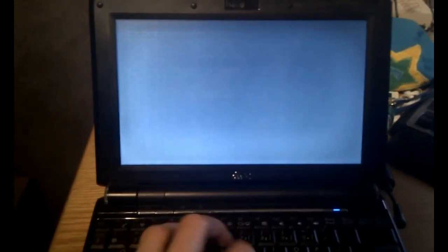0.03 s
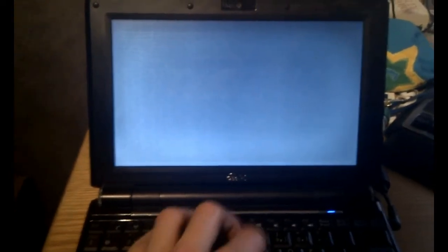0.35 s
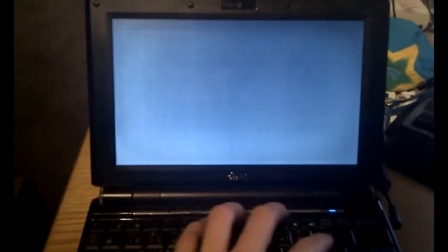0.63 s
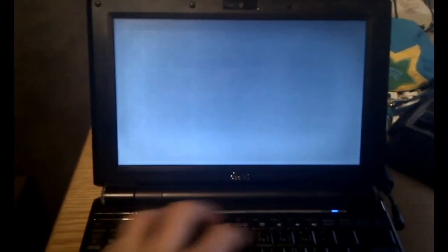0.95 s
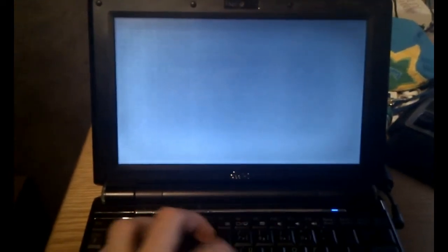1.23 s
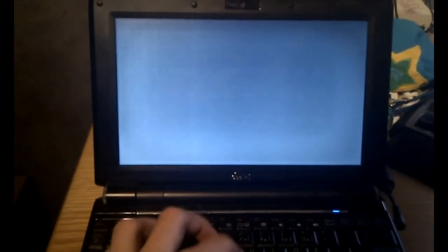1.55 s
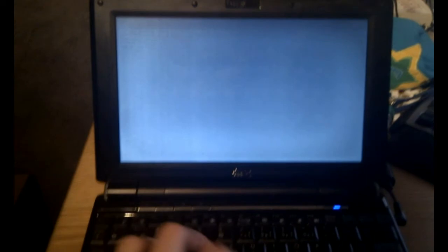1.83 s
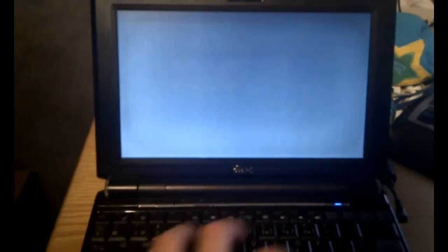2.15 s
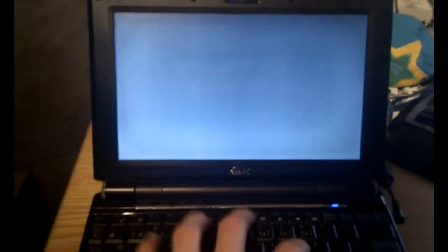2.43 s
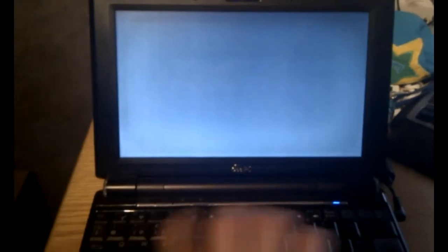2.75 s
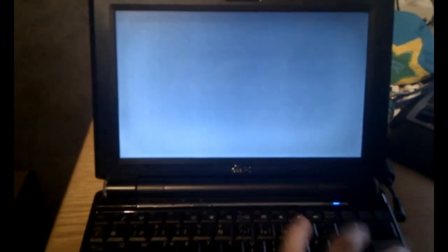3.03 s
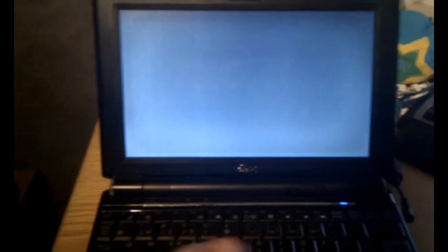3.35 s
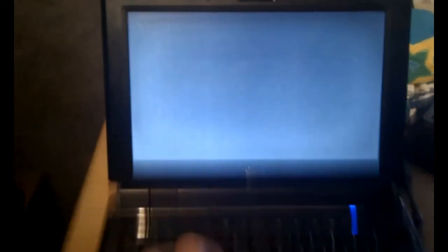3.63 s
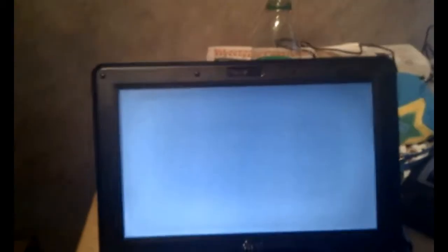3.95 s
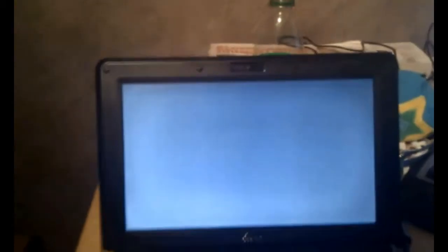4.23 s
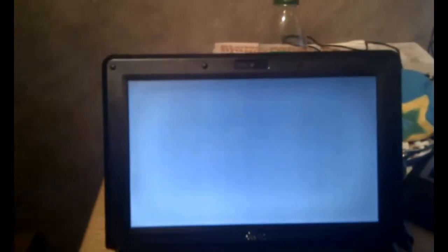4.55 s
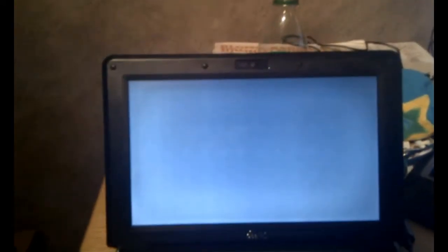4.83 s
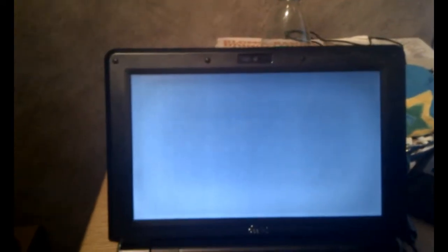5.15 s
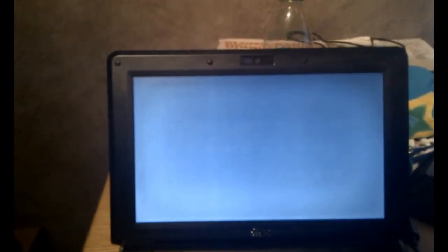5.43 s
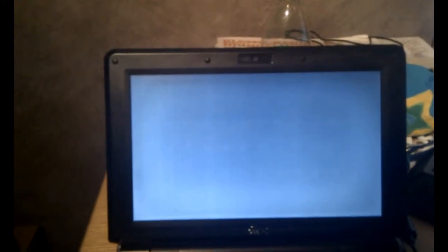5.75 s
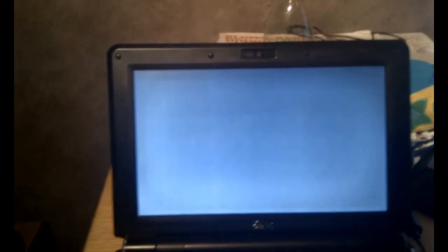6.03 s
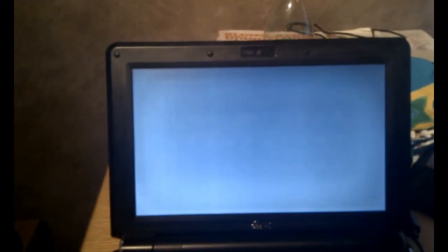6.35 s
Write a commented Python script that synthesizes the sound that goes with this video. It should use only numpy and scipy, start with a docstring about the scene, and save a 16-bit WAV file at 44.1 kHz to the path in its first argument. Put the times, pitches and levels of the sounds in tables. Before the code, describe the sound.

Over a steady hiss and a faint fan hum, small laptop keys click unevenly at close range. A big key lands with a hollow clack, a couple of soft ticks follow, and the typing rests briefly. A second, denser run of plastic clicks ends, after a short gap, in another hard clack. The small room rings very briefly after each stroke.

```python
"""In a quiet room with a steady hiss and a faint fan hum, someone types on a small plastic laptop keyboard.
A first burst ends in the hard clack of a big key at 2.6 s, followed by two soft clicks. After a pause
a second burst runs from 4 to 5.5 s, and the big key clacks again at 6.2 s.
Each stroke is a few tiny contacts: the key cap rings, the plastic snaps, the case knocks.
A near wall echoes every click, and the room rings briefly after it."""
import sys
import numpy as np
from scipy import signal
from scipy.fft import rfft, irfft
from scipy.io import wavfile

SR = 44100
rng = np.random.default_rng(int(sys.argv[2]) if len(sys.argv) > 2 else 0)


def dump_mix(stems):
    """Bounce the given channels to the path in sys.argv[1] as a 16-bit WAV at rate SR."""
    frames = np.atleast_2d(stems).T  # one column per channel
    limited = np.clip(frames, -1, 1)  # hard clip at full scale
    pcm = np.round(limited * 32767).astype(np.int16)
    wavfile.write(sys.argv[1], SR, pcm)


N = 281799

# tone of the fan's air and the microphone's hiss: (frequency [Hz], relative level [dB])
AIR_TONE = [(20, -4.5), (60, 3), (110, -5), (290, 4.5), (430, 1), (600, -0.5), (1000, -1), (1850, -3),
            (2400, -8.5), (5500, -10.5), (9500, -12.5), (13000, -12.5), (16000, -12.5)]
# hums of the fan and desk: (pitch [Hz], width [Hz], level [dB])
FAN_HUMS = [(142.4, 10.6, -69.5), (227.5, 16.5, -67), (354.4, 2.9, -71), (397.5, 9.4, -69),
            (567.5, 4.4, -76), (948.5, 11, -72)]
# tone of the room's ringing: (frequency [Hz], relative level [dB])
ROOM_TONE = [(300, -7), (1200, 7.5), (3000, 3), (5300, 3), (6300, 2), (8500, -9.5), (12000, 1), (16000, 2)]
# how long the room rings: (frequency [Hz], time to fade by 60 dB [s])
ROOM_FADE = [(500, 0.13), (2000, 0.21), (6000, 0.3), (10000, 0.27), (16000, 0.12)]
# notes the laptop case rings at: (pitch [Hz], relative level [dB], time to fade by 60 dB [s])
CASE_NOTES = [(890, -11, .02), (1000, 2.5, 0.047), (1167, 3.5, 0.04), (1350, 6, 0.023), (1735, 5, 0.023),
              (2150, -6, 0.02), (3120, 3, 0.01)]
# tone of a key cap around its ring: (frequency [Hz], relative level [dB])
CAP_TONE = [(3500, -35), (4900, -13.5), (5500, -2.5), (6200, 1.5), (7200, 0.5), (8400, -1), (9500, -4),
            (11000, -33), (16000, -33)]
# tone of plastic snapping on plastic: (frequency [Hz], relative level [dB])
SNAP_TONE = [(300, -22), (900, -19.5), (2400, -9), (3200, -10), (4400, -4.5), (5000, -15), (8500, -15),
             (9900, 3), (11200, 3.5), (12200, 4.5), (13300, 0.5), (15800, -4.5)]
# the big key's clacks: (press time [s], travel time [s], force at the top [dB],
# force at the bottom [dB], case pitch [Hz], release time [s], release force [dB])
BIG_CLACKS = [(2.5824, .0072, -2, -4.5, 1140, 2.6685, -13), (6.1783, .0048, -0.5, 2.5, 1710, 6.2618, -0.5)]
# going down, the big key is touched, gives way, meets its bed and settles:
# (share of travel time [ratio], base ring [dB], base snap [dB], base knock [dB])
BIG_PRESS = [(-.3, -21.5, -38, -58), (0, -17.5, -21.5, -46), (.65, -18.5, -16.5, -46), (1, -26, -21.5, -29)]
# coming up, it lifts off, springs back and hits its stop:
# (share of return time [ratio], base ring [dB], base snap [dB], base knock [dB])
BIG_RELEASE = [(0, -25, -28.5, -55), (.5, -22.5, -23.5, -42), (1, -32, -37, -39.5)]
# small keys going down or coming up: (time [s], cap pitch [Hz], base ring [dB], snap [dB],
# case pitch [Hz], knock [dB], bounce fade time [s])
SMALL_STROKES = [(.003, 5440, -38, -43, 1860, -47, 0.035), (0.1642, 8800, -33, -38, 1300, -50, .045),
                 (.2464, 6700, -46, -47, 990, -60, .01), (.267, 8160, -45.5, -44.5, 1730, -54, 0.047),
                 (.8602, 6760, -41, -46, 1330, -51, .005), (.866, 7860, -33, -40.5, 900, -56, .065),
                 (0.948, 6700, -44.5, -56, 1100, -60, 0.018),
                 (1.0345, 6290, -41.5, -44, 1380, -44.5, 0.017), (1.0605, 6890, -44, -42, 970, -57, .005),
                 (1.0697, 6840, -28, -37.5, 1860, -46, 0.0075),
                 (1.15, 8600, -41.5, -47, 1410, -48.5, 0.034),
                 (1.57, 5740, -27.5, -34.5, 1720, -44.5, 0.02),
                 (1.694, 6840, -41.5, -44.5, 2960, -52, .005),
                 (1.8772, 6000, -36.5, -41.5, 1300, -53, 0.017), (1.9088, 7400, -41.5, -49, 900, -55, .025),
                 (2.0087, 8950, -43.5, -45, 880, -51, 0.022), (2.018, 8600, -40.5, -49, 1490, -54, 0.02),
                 (2.1261, 7060, -35.5, -42, 1700, -43, 0.038), (2.1508, 7800, -37, -45, 1175, -29, .008),
                 (2.236, 7960, -47, -52, 1140, -42, 0.024), (2.261, 6200, -37, -62, 970, -52, .005),
                 (2.9382, 5950, -41, -46, 860, -56, 0.018), (2.991, 6800, -50.5, -62, 880, -51, .01),
                 (4.0132, 6640, -47.5, -50, 990, -51, .005), (4.0626, 6800, -54, -62, 860, -49, .005),
                 (4.1713, 6550, -50, -51, 1420, -47, .005),
                 (4.3051, 8000, -37.5, -46.5, 1160, -45.5, 0.0044),
                 (4.3748, 7840, -49, -62, 1530, -52, .005), (4.397, 6900, -49, -55, 1200, -60, .08),
                 (4.449, 6830, -40, -41, 1320, -46, 0.019), (4.553, 6600, -42, -41.5, 1510, -44.5, 0.04),
                 (4.578, 6160, -46.5, -54, 1360, -58, .005), (4.709, 6570, -31.5, -40.5, 1090, -45, 0.0046),
                 (4.7466, 7700, -29, -35.5, 1790, -46, 0.0074), (4.82, 6950, -34.5, -41.5, 1830, -48, .005),
                 (4.887, 6540, -41.5, -49, 1050, -54, 0.045), (4.9495, 6530, -39, -57, 1160, -52, .005),
                 (4.9927, 7240, -30.5, -39, 1590, -45.5, 0.013),
                 (5.0935, 6960, -32.5, -43, 1800, -48, 0.012), (5.13, 6830, -35, -54, 1080, -50, .005),
                 (5.153, 6500, -59, -58, 1400, -46.5, .005), (5.2638, 6940, -35, -61, 1310, -47, .005),
                 (5.3583, 6900, -26.5, -33, 2970, -39, 0.015), (5.3662, 7190, -41, -43, 1220, -45.5, 0.014),
                 (5.4571, 7200, -34, -40.5, 1310, -49, 0.027)]

WALL_DELAY_S = .0095
CONTACT_SAMPLES = 2048
CONTACT_TIME = np.arange(CONTACT_SAMPLES) / SR   # seconds since a contact began


def from_db(db):
    """Turn decibels into a number to multiply by."""
    return 10 ** (np.asarray(db) / 20)


def at_hz(points, hz):
    """Read a table between its rows, with the octaves evenly spaced."""
    row_hz, value = np.transpose(points)
    return np.interp(np.log(np.maximum(hz, 1)), np.log(row_hz), value)


def with_energy(x, energy=1):
    """Scale a sound so its squared samples add up to this energy."""
    return x * np.sqrt(energy / (np.sum(x ** 2) + 1e-20))


def at_level(x, db, window_s=.002):
    """Give a short sound the energy of a brief window at this level."""
    return from_db(db) * with_energy(x, window_s * SR)


def tone_filter(points):
    """Turn a tone table into a filter that makes no sound before the hit (minimum phase)."""
    log_gain = np.log(from_db(at_hz(points, np.fft.rfftfreq(CONTACT_SAMPLES, 1 / SR))))
    cepstrum = irfft(log_gain)[:CONTACT_SAMPLES // 2]
    return np.exp(rfft(np.r_[cepstrum[0], 2 * cepstrum[1:]], CONTACT_SAMPLES))


def resonance(x, hz, width_hz):
    """Make a sound ring at one pitch; a narrower width rings longer."""
    decay = np.exp(-np.pi * width_hz / SR)
    feedback = [1, -2 * decay * np.cos(2 * np.pi * hz / SR), decay ** 2]
    return signal.lfilter(np.array([1, 0, -1]) * (1 - decay ** 2) / 2, feedback, x)


def fan_and_hiss(air_db=-54):
    """Steady air and hiss, with a few narrow hums stirred up by the fan."""
    tone = from_db(at_hz(AIR_TONE, np.fft.rfftfreq(N, 1 / SR)))
    air = irfft(rfft(rng.standard_normal(N)) * tone, N)
    out = from_db(air_db) * with_energy(air, N)
    for hz, width_hz, db in FAN_HUMS:
        hum = resonance(rng.standard_normal(N), hz, width_hz)
        out += from_db(db) * with_energy(hum, N)
    return out


def room(x, level_db=-14.5, build_s=.0015):
    """After the wall's echo, many more blur into a short tail; its lows and very top fade first."""
    t = np.arange(SR // 2) / SR
    edges_hz = np.geomspace(250, 17000, 13)
    tail = 0
    for low, high in zip(edges_hz, edges_hz[1:]):
        hz = np.sqrt(low * high)
        band_pass = signal.butter(2, [low, high], "band", fs=SR, output="sos")
        band = signal.sosfilt(band_pass, rng.standard_normal(len(t)))
        tail += band * from_db(at_hz(ROOM_TONE, hz) - 60 * t / at_hz(ROOM_FADE, hz))
    tail *= 1 - np.exp(-np.maximum(t - WALL_DELAY_S, 0) / build_s)
    return from_db(level_db) * signal.fftconvolve(x, with_energy(tail))[:N]


def wall_echo(x, level_db=-14.5, smear_s=.00072):
    """The near wall throws the sound back, a little late and a little smeared."""
    age = CONTACT_TIME - WALL_DELAY_S
    scatter = rng.standard_normal(CONTACT_SAMPLES) * (age > 0) * np.exp(-np.abs(age) / smear_s)
    return from_db(level_db) * signal.fftconvolve(x, with_energy(scatter))[:N]


def case_knock(pitch_hz, spot_fade_s, notes_db, spread_db=4.5, rise_s=.0005):
    """The spot under the key gives a dull knock; the whole case rings more faintly."""
    t = CONTACT_TIME
    spot = from_db(-60 * t / spot_fade_s) * np.sin(2 * np.pi * pitch_hz * t)
    hz, db, fade_s = np.transpose(CASE_NOTES)[:, :, None]
    strength_db = db + notes_db + spread_db * rng.standard_normal(hz.shape)
    waves = np.sin(2 * np.pi * (hz * t + rng.random(hz.shape)))
    notes = from_db(strength_db - 60 * t / fade_s) * waves
    return (spot + notes.sum(axis=0)) * (1 - np.exp(-t / rise_s))


def thuds(push_db=-40.5, knock_db=-34.5, rise_s=.00053, relax_s=.052):
    """The big key hits bottom: a hollow knock and a quick push of pressure that eases slowly."""
    out = np.zeros(N)
    for down_s, travel_s, _, bottom_db, *_ in BIG_CLACKS:
        time_s = down_s + .642 * travel_s   # the key bed gives partway through the travel
        age = np.maximum(np.arange(N) / SR - time_s, 0)
        out += from_db(push_db + bottom_db) * (1 - np.exp(-age / rise_s)) * np.exp(-age / relax_s)
        knock = case_knock(pitch_hz=970, spot_fade_s=.029, notes_db=-17)
        start = round(time_s * SR)
        out[start:start + CONTACT_SAMPLES] += at_level(knock, knock_db + bottom_db)
    return out


def contact_noise(tone, rise_s=.00045, hit_s=.00033, chatter_s=.0037, chatter_db=-20):
    """About a millisecond of rough contact, then the loose cap chatters briefly."""
    t = CONTACT_TIME
    pressure = np.exp(-t / hit_s) + from_db(chatter_db) * np.exp(-t / chatter_s)
    pressure *= 1 - np.exp(-t / rise_s)
    return irfft(rfft(rng.standard_normal(CONTACT_SAMPLES) * pressure) * tone)


def big_key(down_cap_hz=6100, up_cap_hz=6600, up_case_hz=1210, return_s=.009):
    """List the big key's contacts: four going down and three lighter ones coming up."""
    contacts = []
    for down_s, travel_s, top_db, bottom_db, case_hz, up_s, up_db in BIG_CLACKS:
        for share, *levels_db in BIG_PRESS:
            db = np.interp(share, [0, 1], [top_db, bottom_db])
            contacts.append((down_s + share * travel_s, down_cap_hz, case_hz, np.add(levels_db, db)))
        for share, *levels_db in BIG_RELEASE:
            contacts.append((up_s + share * return_s, up_cap_hz, up_case_hz, np.add(levels_db, up_db)))
    return contacts


def small_keys(lead_in_s=.0018, lead_in_db=-17, bounce_gap_s=.006, bounce_db=-5.5, fall_db=19):
    """List each stroke's parts: a faint tick that softens its start, the click, four fading bounces."""
    contacts = []
    for time_s, cap_hz, ring_db, snap_db, case_hz, knock_db, fade_s in SMALL_STROKES:
        gap_change, pitch_change = rng.uniform(-1, 1, size=(2, 4))
        delays = np.cumsum(bounce_gap_s * (1 + .25 * gap_change))
        bounces = zip(delays, bounce_db - fall_db * delays / fade_s, 1 + .17 * pitch_change)
        for delay, db, detune in [(-lead_in_s, lead_in_db, 1), (0, 0, 1), *bounces]:
            levels_db = np.add([ring_db, snap_db, knock_db], db)
            contacts.append((max(time_s + delay, 0), cap_hz * detune, case_hz * detune, levels_db))
    return contacts


def keyboard(hard_db=-18.5, soft_body_db=6, soft_dull_db=5):
    """Each contact rings, snaps and knocks; returns the sound sent ahead and that sent all around."""
    ahead, around = np.zeros((2, N + CONTACT_SAMPLES))
    cap, plastic = tone_filter(CAP_TONE), tone_filter(SNAP_TONE)
    for time_s, cap_hz, case_hz, (ring_db, snap_db, knock_db) in big_key() + small_keys():
        hardness = min(from_db(ring_db - hard_db), 1)
        softness = 1 - hardness
        click = contact_noise(cap)
        ring = resonance(click, cap_hz, width_hz=510 + 390 * hardness)   # a hard finger damps the cap
        ring = at_level(ring + from_db(-3.5) * click, ring_db + 3 * hardness)
        # a soft touch has more body and less treble
        tilt = [(3200, soft_body_db * softness), (4600, 0), (9000, 0), (13000, -soft_dull_db * softness)]
        snap = at_level(contact_noise(plastic * tone_filter(tilt)), snap_db)
        knock = at_level(case_knock(case_hz, spot_fade_s=.014, notes_db=-17.5), knock_db)
        # louder clicks get a stronger, broader room tail
        tail_boost = at_level(click, ring_db - 2) * np.sqrt(hardness)
        start = round(time_s * SR)
        span = slice(start, start + CONTACT_SAMPLES)
        ahead[span] += ring + snap + knock
        around[span] += from_db(-8) * ring + tail_boost + snap + from_db(-4) * knock
    return ahead[:N], around[:N]


def scene():
    """Mix the close keys, their echoes, the thuds and the background into one channel."""
    ahead, around = keyboard()
    return (ahead + wall_echo(ahead) + room(around) + thuds() + fan_and_hiss())[None, :]


def record(dry):
    """The highest treble is cut steeply, and the converter shifts the wave slightly below zero."""
    cutoff_hz, offset = 15900, -.0218
    low_pass = signal.firwin(301, cutoff_hz, fs=SR)
    return signal.fftconvolve(dry, low_pass[None, :], mode="same") + offset


dry = scene()
out = record(dry)
dump_mix(out)
```